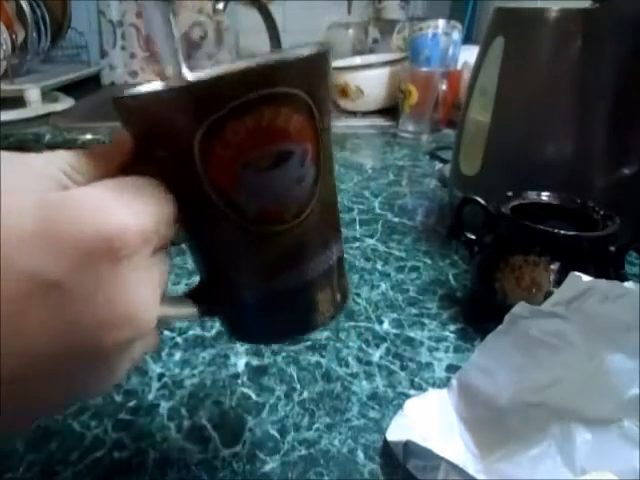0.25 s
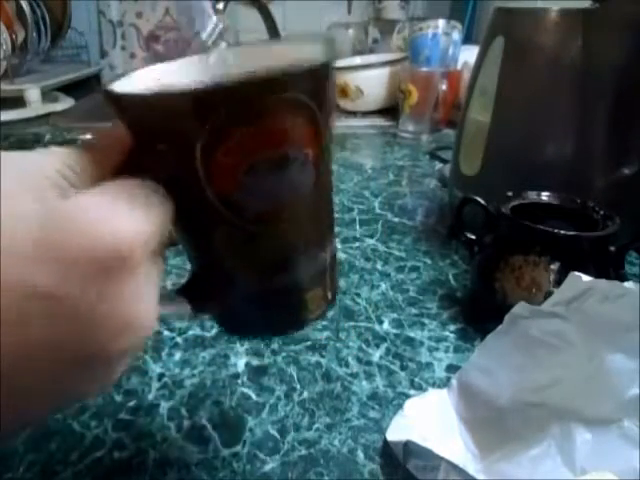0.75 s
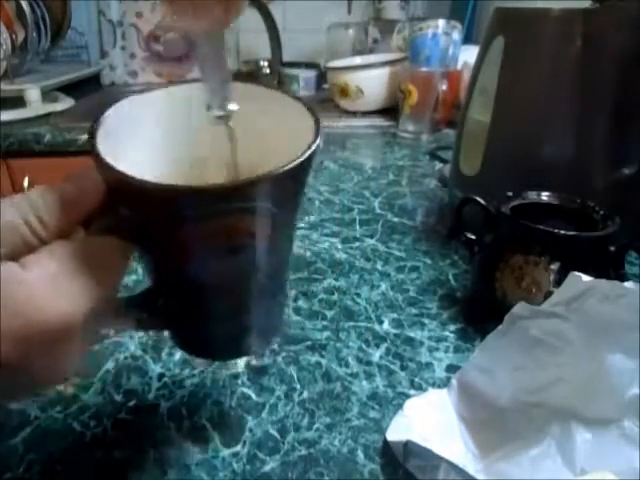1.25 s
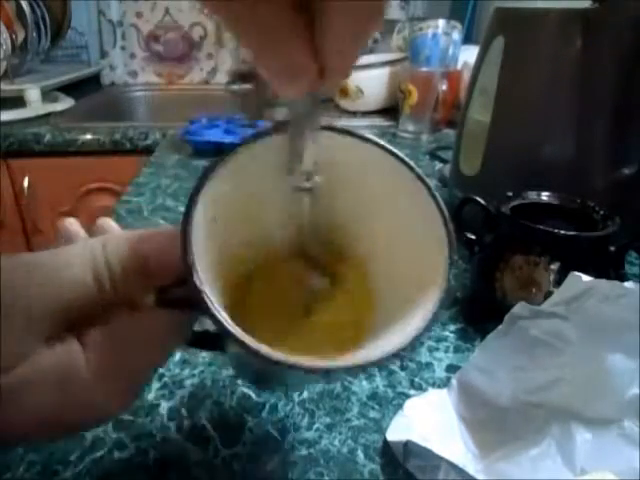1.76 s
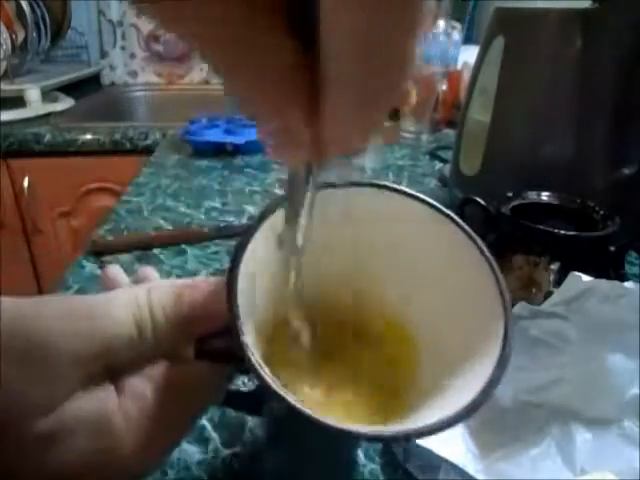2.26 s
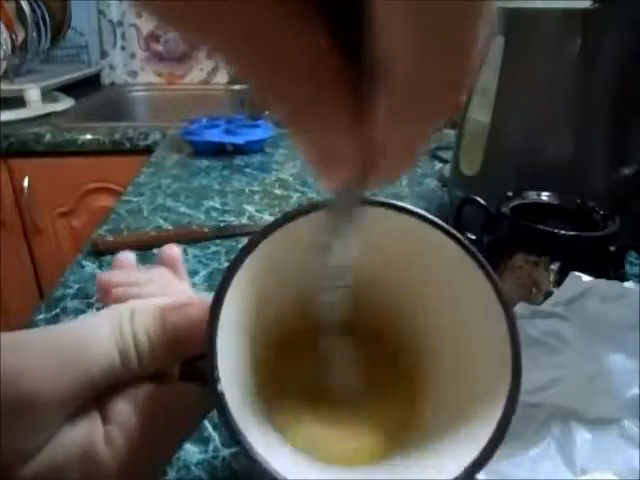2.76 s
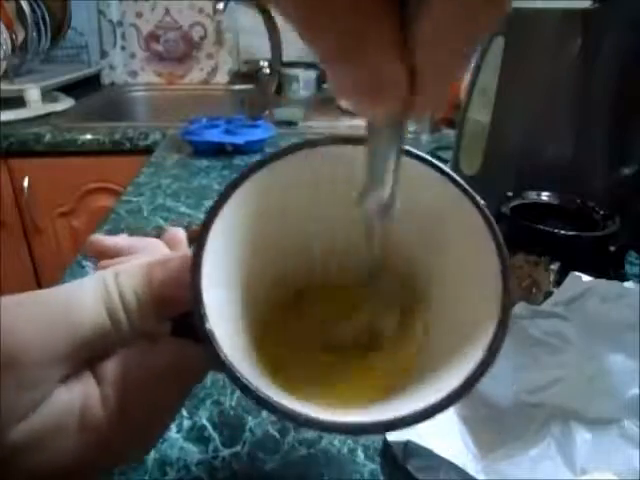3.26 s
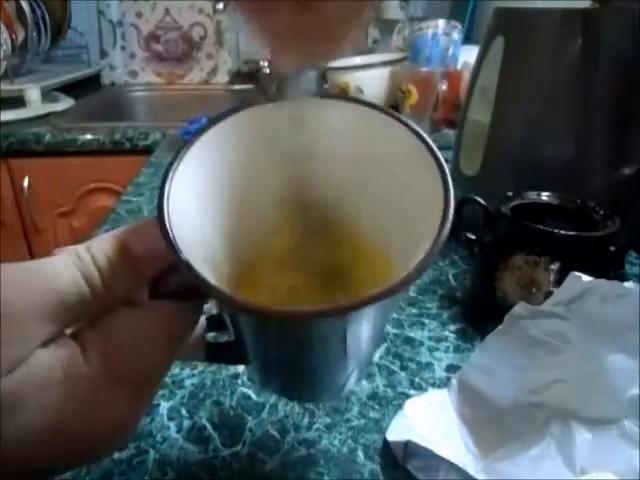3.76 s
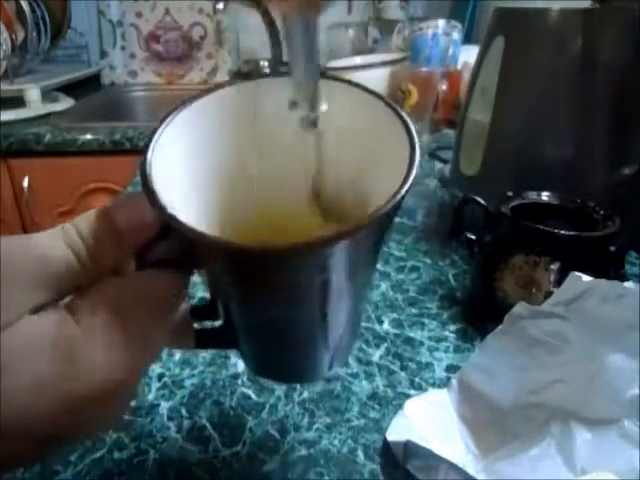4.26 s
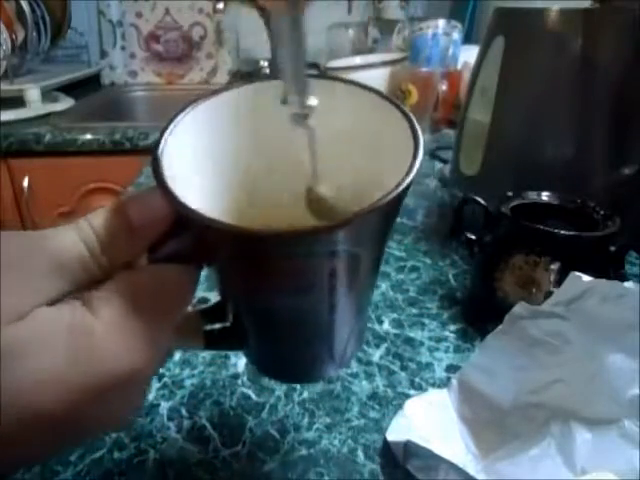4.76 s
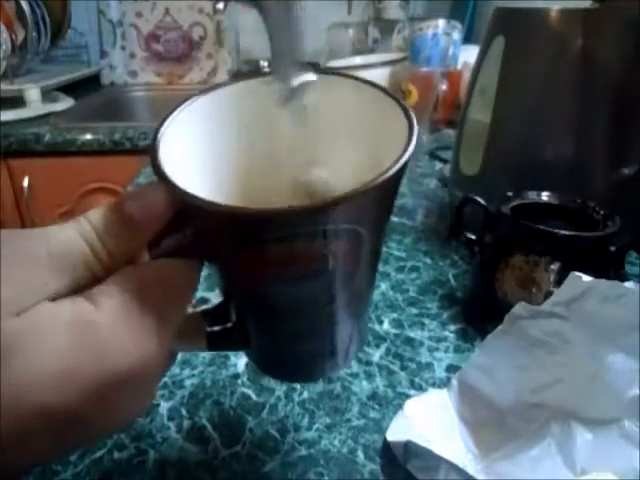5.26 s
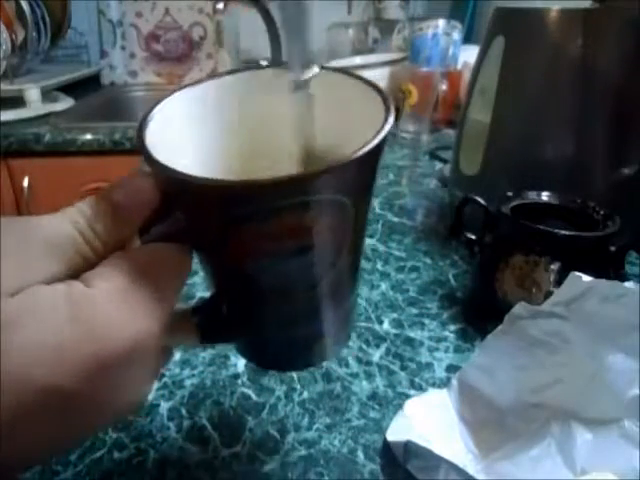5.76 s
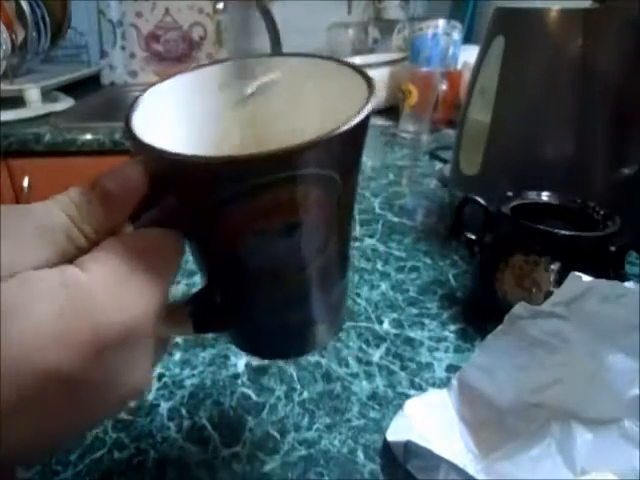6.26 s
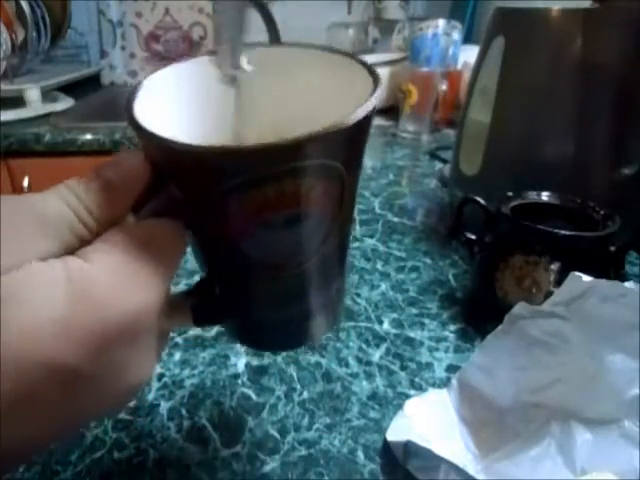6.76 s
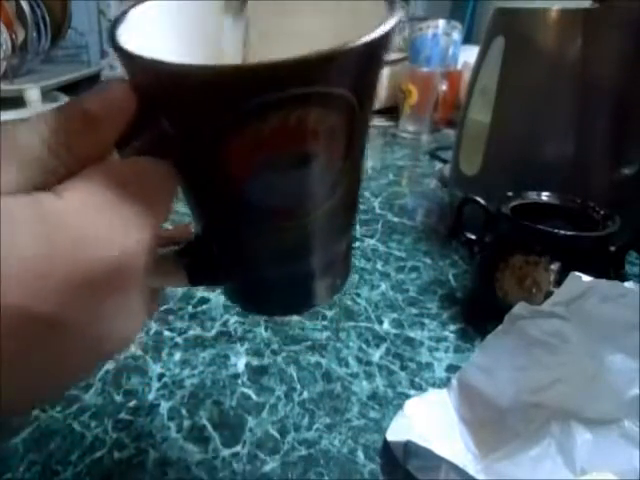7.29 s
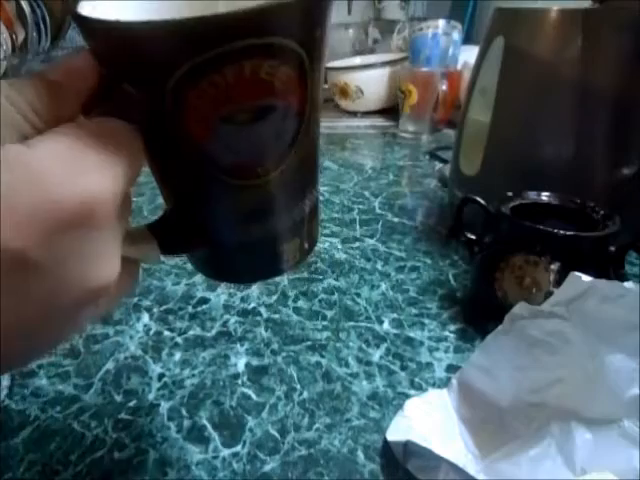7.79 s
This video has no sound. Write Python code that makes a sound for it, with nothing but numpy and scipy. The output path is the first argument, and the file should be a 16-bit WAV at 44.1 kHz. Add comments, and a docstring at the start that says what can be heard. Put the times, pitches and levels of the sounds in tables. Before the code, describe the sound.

In a small hard-surfaced kitchen, a metal teaspoon briskly stirs a shallow, thin, wet mixture in a hand-held ceramic mug, heard close and central. A clear clink opens, then softer taps and short gritty scrapes come about five times a second. A firmer clink falls near 1.2 seconds and the hardest, brightest clack near 1.7, with more strong knocks around 2.6 and 3.0. From 3 to 4.7 seconds the strokes are duller and cushioned by liquid, with wet rasps, small rising squelches, bubbles and fizz. From 4.7 to 5.7 knocks crowd together, hollow and rattling, with scrapes pausing. From 5.8 scraping returns strongly between lighter, ringing taps. After 7 the strokes thin out, and a few clear clinks finish near 7.6, 7.8 and 8.0. Rings are short, with brief room reflections; soft air noise and faint low mains hum continue underneath.

```python
"""A small hard kitchen: a steel teaspoon beats a thin, wet mixture in a hand-held ceramic mug,
about five turns a second. Knocks are struck modes with noise cracks and quick rebounds; scrapes along
the bottom are jerky grit through mug and air resonances, with a rising squelch, bubbles and fizz.
Decaying-noise tails answer from the room; faint mains hum and shaped room noise lie underneath."""
import sys
import numpy as np
from scipy import signal
from scipy.fft import rfft, irfft, next_fast_len
from scipy.io import wavfile
from scipy.ndimage import map_coordinates

SR = 44100
rng = np.random.default_rng(int(sys.argv[2]) if len(sys.argv) > 2 else 0)


def int16_out(signal):
    """Quantize to a 16-bit WAV file."""
    q = np.round(np.clip(np.atleast_2d(signal).T, -1, 1) * 32767)
    wavfile.write(sys.argv[1], SR, q.astype(np.int16))


N = 354123

# Spoon meets mug. Each row: start in seconds, strength in dB, wall ring over it in dB before the part's
# trim, hollow tok of the bottom over it in dB.
KNOCKS = [(.0067, -30.5, 7, -3.5), (.204, -45, 11.5, -3.5), (.384, -42.5, 13.5, 1.5), (0.578, -51.5, -1, 3),
          (0.765, -49, 12, -4), (.943, -45.5, -2.5, -14), (.9651, -46, 9.5, -7), (1.015, -58.5, 18, 6),
          (1.1828, -31.5, 4.5, -12.5), (1.468, -48, -3.5, -14), (1.498, -51, -2, -10),
          (1.6771, -18.5, -2.5, -13.5), (1.78, -39, -2.5, -10), (1.896, -45.5, -6, -2.5),
          (1.9261, -32.5, 2, -1.5), (1.9762, -38.5, 1, -5.5), (2.037, -46.5, -12, -12),
          (2.1534, -32.5, -2.5, -15), (2.3886, -36, -8.5, -17.5), (2.4603, -41.5, -26, -2.5),
          (2.589, -23, -5.5, -12), (2.7993, -39, -8.5, -6), (2.837, -33, 1, -10), (2.879, -36.5, -12, -9),
          (3.0139, -22, -2, -3.5), (3.108, -45.5, -13.5, -22), (3.228, -41, -10, 0.5),
          (3.339, -43, -21, -9.5), (3.499, -39.5, -10, -3.5), (3.552, -32.5, -20, -10.5),
          (3.7677, -33, -21.5, -13), (3.967, -40, -16.5, -17.5), (4.1494, -40.5, -13, -6.5),
          (4.3139, -39, 1.5, -3.5), (4.52, -41, -10, -7.5), (4.5653, -40, -19, -6), (4.6727, -45.5, -6, -6),
          (4.731, -35.5, -21, -6), (4.8405, -41, -2.5, 1.5), (4.9221, -40.5, -8.5, -5),
          (5.0038, -39.5, -3.5, 8.5), (5.088, -38, -9.5, -4.5), (5.18, -28, -5.5, -6.5),
          (5.2555, -37, -10.5, -10), (5.345, -40.5, -7, 6.5), (5.4389, -38, -10.5, -4.5),
          (5.625, -35, -11.5, -5.5), (5.78, -39, 6.5, 4), (5.861, -38.5, -18, -5), (5.922, -30.5, 0.5, -16),
          (5.9672, -38.5, 8.5, -1.5), (6.125, -37.5, 4, -10.5), (6.248, -42, -10, -14),
          (6.314, -39, 8, -11), (6.364, -48.5, -3, -3), (6.492, -38, 5, -7), (6.5762, -41, -4, 3),
          (6.681, -46.5, 7.5, -9), (6.7366, -38.5, -6, -0.5), (6.862, -41.5, 5, -13), (6.9052, -40, 6.5, 5),
          (7.345, -47.5, 2.5, -9), (7.389, -41.5, 2.5, -10), (7.5746, -31, 4, -10.5), (7.7837, -27, 6, -3),
          (7.979, -33.5, 5.5, -3)]
# Air in the mug shifts as the mixture climbs the wall. Each row: time in seconds, pitch in Hz.
AIR_PITCH = [(0, 1003), (2, 1000), (2.5, 1220), (3.01, 1034), (3.25, 1200), (4.7, 1200), (5, 1298),
             (5.45, 1330), (5.8, 1236)]


def amp(db):
    """Decibels to gain."""
    return 10 ** (np.asarray(db) / 20)


def unit(x):
    """Scale to rms 1."""
    return x / np.sqrt(np.mean(x ** 2) + 1e-20)


def along(points, hz):
    """Interpolate (Hz, value) points on a log frequency axis."""
    point_hz, value = np.transpose(points)
    return np.interp(np.log(hz + 1), np.log(point_hz + 1), value)


def at(rows, s):
    """The values of a control curve at s seconds."""
    times, *columns = np.transpose(rows)
    return [np.interp(s, times, column) for column in columns]


def filtered(x, response):
    """Filter x by a response given as a function of Hz."""
    n = x.shape[-1]
    padded = next_fast_len(n + SR // 10)
    return irfft(rfft(x, padded) * response(np.fft.rfftfreq(padded, 1 / SR)), padded)[..., :n]


def add(track, s, sound):
    """Mix a sound into a track at s seconds."""
    part = track[max(round(s * SR), 0):][:len(sound)]
    part += sound[:len(part)]


def clinks(thud_db=-15, hollow_db=0, wall_db=1.0, clack_db=0.97, ping_db=3, tick_db=-1.3):
    """Each knock is a blow and a few rebounds; hand and mixture damp the ring quickly."""
    # Rebounds change in spacing and strength as the stirring goes on.
    # Each row: time in seconds, mean time between rebounds in seconds, rebound as a factor.
    grip = [(0, 0.0029, 0.26), (1.2, 0.0047, 0.29), (1.7, 0.005, 0.38), (3.01, .0044, 0.31),
            (4.7, 0.0098, 0.53), (5, 0.012, 0.23), (5.45, 0.014, 0.37), (5.8, .0055, 0.51),
            (6.3, 0.0052, 0.86), (8, 0.0054, 0.26)]
    # Modes of each part. Each row: Hz, t60 in seconds, relative energy in dB.
    thud_modes = [(346, 0.039, -3), (515, 0.061, 6.5), (683, 0.0098, -2)]  # whole mug jolted in the hand
    hollow_modes = [(1200, 0.03, 8), (1000, 0.047, -14)]  # air in the mug, around its usual pitch
    wall_modes = [(1597, 0.014, -10), (2125, 0.016, -2.5), (2269, 0.076, -0.5), (2408, 0.012, -1.5)]  # lowest bending modes of the wall
    clack_modes = [(2844, 0.021, 10.5), (3450, 0.026, 1.5), (3580, 0.012, -3.5), (4675, 0.0063, -18.5),
                   (4905, 0.034, -5.5)]  # spoon bowl on glaze
    ping_modes = [(6060, 0.029, 2.5), (6830, 0.014, -29.5), (6640, 0.0099, 21), (8100, 0.013, -18)]  # next pair of the wall
    tick_modes = [(8700, 0.011, 8.5), (9300, 0.0094, 11), (10060, 0.0094, 6.5), (12980, 0.041, 2.5),
                  (15300, .012, -22)]  # highest modes
    # A knock with a weaker wall ring than this lands in the mixture, which slows and cushions its rebound.
    bottom_db, bottom_gap_s, bottom_rebound = -7.5, .009, .5
    # The stronger the rebound, the less the spoon pings and clacks, and the more it ticks.
    ping_db_per_wall_db, ping_rattle_db, tick_rattle_db = 1, -12, 6

    track = np.zeros(N)
    for s, db, wall, hollow in KNOCKS:
        air_hz, = at(AIR_PITCH, s)
        gap_s, rebound = at(grip, s)
        if wall < bottom_db:
            gap_s = max(gap_s, bottom_gap_s)
            rebound = min(rebound, bottom_rebound)
        ping = ping_db_per_wall_db * wall + ping_rattle_db * rebound
        rattle = tick_rattle_db * rebound / 2
        delays_s = np.append(0, np.cumsum(gap_s * rng.uniform(.6, 1.4, 3)))
        # modes, level dB, pitch factor, pitch scatter, crack dB
        parts = [(thud_modes, thud_db + (hollow + wall) / 4, 1, .05, 2),
                 (hollow_modes, hollow + hollow_db, air_hz / hollow_modes[0][0], .02, -7),
                 (wall_modes, wall + wall_db, 1, .003, -8),
                 (clack_modes, clack_db - rattle, 1, .025, -1),  # shifts with the point of contact
                 (ping_modes, ping + ping_db, 1, .005, -2),
                 (tick_modes, tick_db + rattle, 1, .005, -2)]
        for modes, part_db, pitch, detune, crack_db in parts:
            sound = ring(modes, delays_s, np.clip(rebound, 0, 1), pitch, scatter_db=3.5,
                         detune=detune, crack_db=crack_db, crack_t60_s=0.02)
            sound *= np.sqrt(SR / 50) / np.linalg.norm(sound)  # level as rms over 20 ms
            add(track, s, amp(db + part_db) * sound)
    return track


def ring(modes, delays_s, rebound, pitch, scatter_db, detune, crack_db, crack_t60_s):
    """One struck part: modes at fresh strengths repeat at each contact, with a new noise crack each time."""
    t = np.arange(SR // 14) / SR
    hz, t60_s, db = np.transpose(modes)[:, :, None]
    level, shift, phase = rng.standard_normal((3, len(modes), 1))
    waves = np.sin(2 * np.pi * (pitch * hz * (1 + detune * shift) * t + phase))
    decay = amp(db + scatter_db * level - 60 * t / t60_s) / np.sqrt(t60_s)
    blow = np.sum(decay * waves, axis=0)
    blow *= 1 - np.exp(-t * hz.min())  # builds up over the first cycle
    tone, contact = np.zeros((2, SR // 9))
    for k, delay_s in enumerate(delays_s):
        add(tone, delay_s, rebound ** k * blow)
        add(contact, delay_s, rebound ** k * amp(-60 * t / crack_t60_s))
    edges_hz = [hz.min() * .85, min(hz.max() * 1.12, SR * .45)]
    band = signal.butter(2, edges_hz, "band", fs=SR)
    crack = signal.lfilter(*band, contact * rng.standard_normal(len(contact)))
    return unit(tone) + amp(crack_db) * unit(crack)


def afterring(scatter_db=3.0):
    """A few modes outlast the knock: the wall sings faintly, and hard blows set the spoon's stem ringing."""
    # Wall modes that hand and mixture hardly damp. Each row: Hz, t60 in seconds, level over the wall ring in dB.
    sing = [(2270, 0.29, -21), (6200, 0.2, -23.5), (6840, .24, -22)]
    # Spoon's stem. Each row: Hz, t60 in seconds, level over a hard blow in dB.
    steel = [(4630, .11, -11), (4877, .13, -10), (10170, .07, -5), (12380, .08, -15)]
    # The stem loses steel_falls dB, over the knock itself, for each dB a blow is softer than hard_db.
    hard_db, steel_falls = -22, 0.95

    track, t = np.zeros(N), np.arange(SR // 3) / SR
    for s, db, wall, _ in KNOCKS:
        stem_db = steel_falls * min(db - hard_db, 0)
        for modes, part_db in [(sing, wall), (steel, stem_db)]:
            hz, t60_s, level = np.transpose(modes)[:, :, None]
            level = level + scatter_db * rng.standard_normal(level.shape)
            waves = amp(level - 60 * t / t60_s) * np.sin(2 * np.pi * hz * t)
            add(track, s, amp(db + part_db) * np.sum(waves, axis=0))
    return track


def scrapes(body_db=-4, hollow_db=-7, squelch_db=3, bubble_db=-8, fizz_db=-28, pocket_hz=3300, rise=0.27,
            edge_s=0.0026, jerk_db=7.0, jerk_rate_hz=150):
    """Jerky friction rings the mug and its air; a closing pocket under the spoon squelches upward and
    sheds bubbles."""
    # Spoon drags along the bottom. Each row: start in seconds, length in seconds, level in dB.
    strokes = [(0.254, 0.062, -47.5), (.435, 0.064, -50), (0.647, 0.056, -49.5), (0.818, 0.08, -52),
               (0.982, 0.096, -45.5), (1.263, 0.15, -52.5), (1.529, 0.099, -45.5), (2.002, .095, -48),
               (2.226, 0.054, -43.5), (2.429, 0.037, -47), (2.651, .032, -41), (3.266, 0.065, -49),
               (3.376, 0.063, -54.5), (3.552, .02, -40.5), (3.593, 0.049, -53.5), (3.969, 0.05, -42),
               (4.159, 0.086, -45.5), (4.338, 0.086, -40.5), (4.524, 0.071, -44), (4.685, 0.057, -41.5),
               (5.802, 0.056, -38), (6.002, 0.072, -38), (6.204, 0.064, -42), (6.385, 0.07, -38.5),
               (6.584, 0.049, -40.5), (6.753, 0.058, -43.5), (6.938, 0.11, -41), (7.118, .155, -56.5),
               (7.415, .09, -41.5), (7.655, 0.035, -37)]
    # Mug under friction. Each row: Hz, width in Hz, relative level in dB.
    mug_modes = [(2820, 240, 3), (3700, 1800, -6), (4900, 140, 1.5), (7350, 1600, -22)]
    # Wet film's spectrum. Each row: Hz, relative density in dB per Hz.
    fizz = [(5000, -16.5), (9400, 21), (11200, 8), (13000, 12.5)]
    # A stroke shorter than swell_s swells; a longer one eases off as the spoon slows.
    swell_s, fade_db_per_s = 0.028, -190
    squelch_db_per_s = -110  # the longer the stroke, the less sharply the pocket closes

    def mug(f):
        total = 0
        for k, (hz, width_hz, db) in enumerate(mug_modes):
            damping = 1j * f * width_hz
            total = total + (-1) ** k * amp(db) * damping / (hz * hz - f * f + damping)
        return total

    track, t = np.zeros(N), np.arange(SR // 5) / SR
    for start_s, length_s, db in strokes:
        progress = np.minimum(t / max(length_s, edge_s), 1)
        extra_s = length_s - swell_s
        # the spoon catches and slips
        jerks = map_coordinates(rng.standard_normal(len(t) // 100), [t * jerk_rate_hz], order=1)
        pressure = np.clip(np.minimum(2 * t, length_s + edge_s - t) / edge_s, 0, 1)
        pressure *= amp(fade_db_per_s * extra_s * progress + jerk_db * jerks)
        pressure /= np.sqrt(np.mean(pressure[progress < 1] ** 2) + 1e-12)
        drive = grit(len(t), rate_hz=6000, spread_db=4)

        air_hz = at(AIR_PITCH, start_s)[0] * (1 + 0.14 * (.5 - progress))
        air = gliding(drive, air_hz, width_hz=70)
        body = amp(body_db) * unit(filtered(drive, mug)) + amp(hollow_db) * air

        pocket = pocket_hz * (1 + rise * progress)
        squelch = gliding(drive, pocket, width_hz=370) + gliding(drive, 1.69 * pocket, width_hz=220) / 2
        froth = bubbles(t, pocket, count=120, spread=0.402, cycles=2.7, size_db=2.5)
        wet = amp(squelch_db + squelch_db_per_s * extra_s) * unit(squelch) + amp(bubble_db) * froth

        foam = bubbles(t, 3 * pocket, count=400, spread=.25, cycles=9, size_db=3)
        film = unit(filtered(foam + drive / 2, lambda f: amp(along(fizz, f))))
        # the film fizzes even under a light touch: its dB grow half as fast as the rest
        sound = amp(db) * (body + wet) + amp(db / 2 + fizz_db) * film
        add(track, start_s, pressure * sound)
    return track


def grit(count, rate_hz, spread_db):
    """Friction as random tiny impulses of unequal size, rms 1."""
    present = rng.random(count) < rate_hz / SR
    size = rng.standard_normal(count) * amp(spread_db * rng.standard_normal(count))
    return unit(present * size)


def gliding(drive, hz, width_hz):
    """A resonance whose centre follows hz: shift down, one-pole low-pass, shift back; rms 1."""
    turn = np.exp(2j * np.pi * np.cumsum(hz) / SR)
    pole = np.exp(-np.pi * width_hz / SR)
    return unit(np.real(turn * signal.lfilter([1], [1, -pole], drive / turn)))


def bubbles(t, centre_hz, count, spread, cycles, size_db):
    """Tiny bubbles squeezed out of the mixture, each a short rising blip near centre_hz at its moment."""
    start = rng.integers(0, len(t), count)[:, None]
    pitch, size = rng.standard_normal((2, count, 1))
    age_s = t[:SR // 60]
    hz = centre_hz[start] * np.exp(spread * pitch)
    life = age_s * hz / cycles
    envelope = amp(size_db * size) * life * np.exp(-life)
    blips = envelope * np.sin(2 * np.pi * hz * age_s * (1 + 0.0022 * life))
    places = (start + np.arange(len(age_s))).ravel()
    return unit(np.bincount(places, blips.ravel(), len(t))[:len(t)])


def counter(x, delay_s=.0017):
    """The worktop's reflection arrives just after the direct sound, with opposite sign in the two channels."""
    # Each row: Hz, side over mid in dB.
    width = [(250, -17.5), (2000, -28), (5000, -11), (13000, -5)]
    return filtered(x, lambda f: amp(along(width, f)) * np.exp(-2j * np.pi * f * delay_s))


def kitchen(x, count=4):
    """Diffuse decaying tails; the mug keeps moving, so every 0.2 s the sound meets another of them."""
    # Each row: Hz, t60 in seconds.
    decay = [(200, 0.35), (2300, 0.41), (6500, 0.34), (13000, 0.26)]
    wet, turn = np.zeros((2, N)), np.arange(N) // (SR // 5) % count
    for k in range(count):
        hz, t, z = signal.stft(rng.standard_normal((2, SR // 2)), SR, nperseg=256)
        fade = amp(-60 * t / along(decay, hz)[:, None])
        mid, side = signal.istft(z * fade, SR, nperseg=256)[1]
        tail = np.array([mid + amp(-19.0) * side, mid - amp(-8.5) * side])
        tail = np.pad(tail / np.linalg.norm(tail[0]), ((0, 0), (SR // 250, 0)))  # 4 ms late
        wet += signal.oaconvolve((x * (turn == k))[None], tail, axes=1)[:, :N]
    return wet


def background(air_db=2, side_db=-9):
    """Soft room noise is shaped Gaussian noise; the hum of a mains appliance is steady sines."""
    # Room noise spectrum. Each row: Hz, relative density in dB per Hz.
    air_spectrum = [(20, -23), (40, -29), (70, -13), (140, 0), (280, -3), (550, -1.5), (1150, -6.5),
                    (3500, -12.5), (14000, -27)]
    # Room noise level. Each row: time in seconds, level in dB before air_db.
    air_level = [(0, -63), (2.4, -66), (5.7, -59.5), (7.5, -61), (8.03, -62.5)]
    # Each row: Hz, level in dB rms.
    hum_tones = [(49, -74), (98.3, -73.5)]

    t = np.arange(N) / SR
    noise = rng.standard_normal((2, N))
    mid, side = unit(filtered(noise, lambda f: amp(along(air_spectrum, f))))
    air = np.array([mid + amp(side_db) * side, mid - amp(side_db) * side])
    hum = np.zeros(N)
    for hz, db in hum_tones:
        hum += np.sqrt(2) * amp(db) * np.sin(2 * np.pi * (hz * t + rng.random()))
    return air * amp(air_db + at(air_level, t)[0]) + hum


def scene(room_db=-13):
    """The mug is close and central; its two channels differ mainly in the treble."""
    mug = clinks() + afterring() + scrapes()
    side = counter(mug)
    direct = np.array([mug + side, mug - side])
    return direct + amp(room_db) * kitchen(mug) + background()


def record(dry):
    """Roll off the highest treble and keep nothing from 16.5 kHz up."""
    # Each row: Hz, gain in dB.
    treble = [(13900, -0.5), (14250, 4), (14500, -19.5), (16000, -46)]
    top_hz = 16500
    return filtered(dry, lambda hz: amp(along(treble, hz)) * (hz < top_hz))


dry = scene()
out = record(dry)
int16_out(out)
```